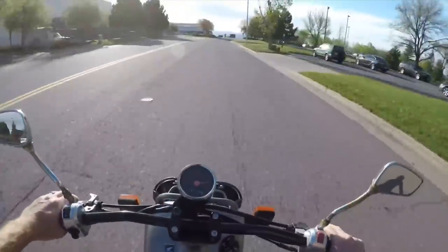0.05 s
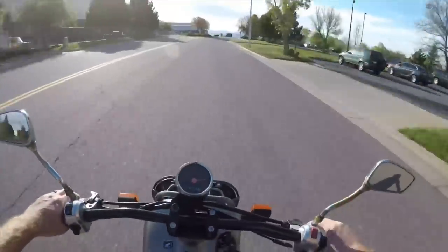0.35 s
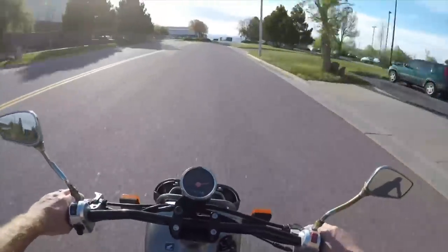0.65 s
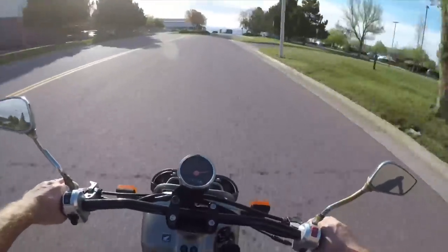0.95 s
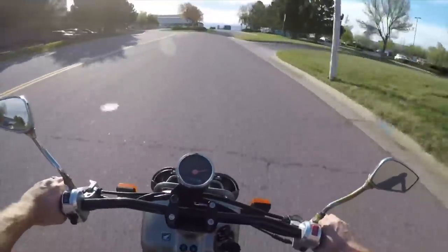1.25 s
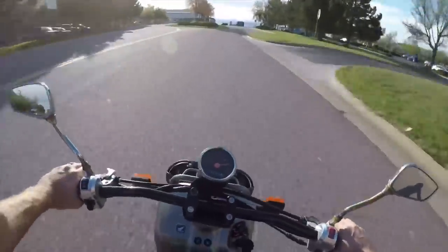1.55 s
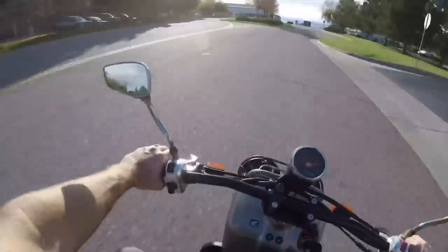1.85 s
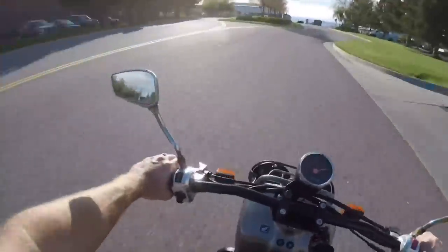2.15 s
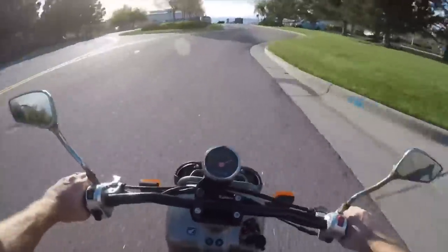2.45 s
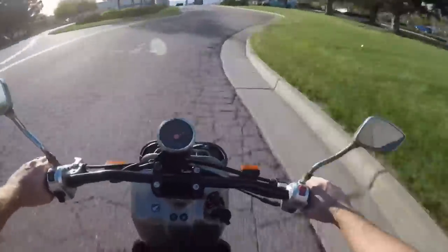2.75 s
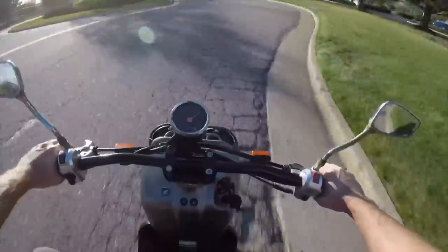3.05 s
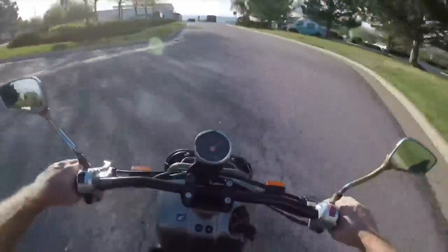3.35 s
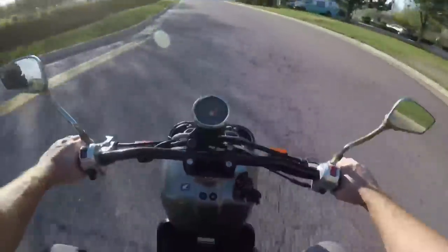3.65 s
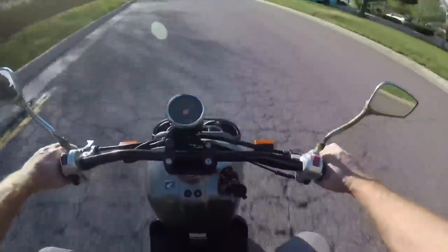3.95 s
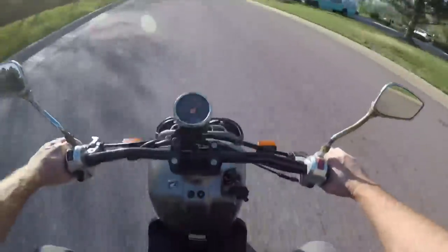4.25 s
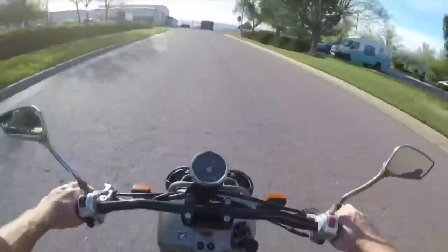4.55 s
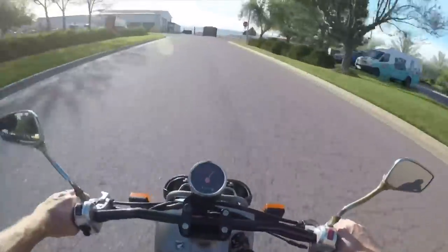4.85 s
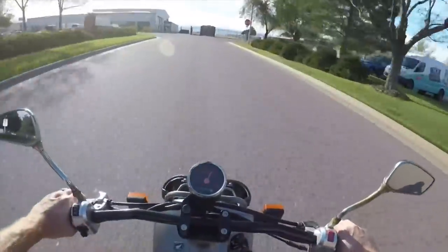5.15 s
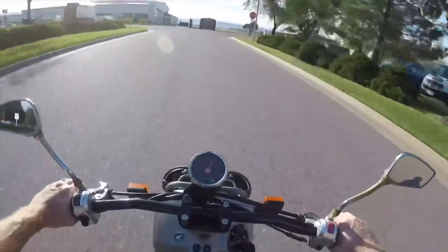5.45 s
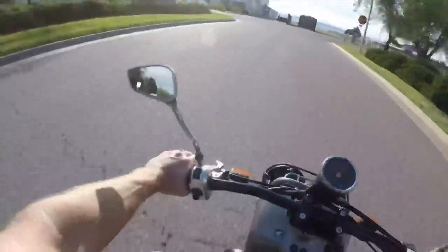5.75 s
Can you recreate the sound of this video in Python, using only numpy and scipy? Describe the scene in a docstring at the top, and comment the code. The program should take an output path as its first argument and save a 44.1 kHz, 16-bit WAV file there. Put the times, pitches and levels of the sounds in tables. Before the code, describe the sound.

A small one-cylinder scooter with an open exhaust is heard close up from the rider's seat, moving along a street. It starts out pulling hard, with a raspy, slightly brassy buzz. At about 0.5 seconds the throttle shuts and the engine coasts, staying loud while its pitch sinks steadily to the end. From around 3.5 seconds some firings go weak, and the exhaust turns into a hollow, uneven burble with small dry pops, most ragged in the last second. Wind rumbles on the microphone throughout, with a gust just before 6 seconds. Underneath are steady tyre hiss, a fine crunch of grit and light valve chatter. Faint, falling gear whines come and go between 1.5 and 5 seconds, and a thin metallic sizzle swells slightly around 5 seconds. Loose parts give two short, bright ticks at about 5.5 seconds.

```python
"""On a street, from the seat of a small one-cylinder scooter with an open exhaust.
Each firing sends a puff of gas down the pipe and makes it ring. The scooter pulls hard, the throttle
shuts after half a second, and the engine runs down, burbling as some firings go weak.
Valves chatter, gears whine, rubbing metal sizzles, and loose parts on the frame tick twice.
Wind buffets the microphone while the tyres hiss and crunch over the asphalt."""
import sys
import numpy as np
from scipy import signal
from scipy.fft import rfft, irfft
from scipy.io import wavfile
from scipy.ndimage import uniform_filter1d, minimum_filter1d

SR = 44100
rng = np.random.default_rng(int(sys.argv[2]) if len(sys.argv) > 2 else 0)


def dump_mix(stems):
    """Bounce the given channels to the path in sys.argv[1] as a 16-bit WAV at rate SR."""
    frames = np.atleast_2d(stems).T  # one column per channel
    limited = np.clip(frames, -1, 1)  # hard clip at full scale
    pcm = np.round(limited * 32767).astype(np.int16)
    wavfile.write(sys.argv[1], SR, pcm)


N = 264159
T = np.arange(N) / SR

# how fast the engine runs: (time [s], speed [firings per s])
ENGINE_SPEED = [(0, 57.8), (.15, 57.8), (.34, 56.1), (.56, 52.961), (.98, 51.019), (1.8, 46.573),
                (2.45, 43.724), (3.77, 38.789), (5.1, 35.711), (6, 34.394)]
# how far the throttle is open: (time [s], opening [0 to 1])
THROTTLE = [(0, 0.98), (.15, 0.9), (.23, 0.58), (.44, 0.85), (.48, 0), (6, 0)]
# how often the slowing engine misses (fires weakly): (time [s], gap between misses [firings])
MISS_EVERY = [(3.55, 6.1), (4.6, 3.7), (5.4, 4.2), (5.6, 2)]
# exhaust volume, highest midway through the run-down: (time [s], gain [dB])
EXHAUST_VOLUME = [(0, -17), (.44, -19.5), (.6, -16.5), (2, -13.5), (3.6, -14.5), (5.75, -14), (6, -17.5)]
# A "tone" table says how strong the low and high parts of a sound are next to each other.
# tone of a puff while pulling: (frequency [Hz], level [dB])
PUFF_PULLING = [(30, -41), (105, 5.5), (225, -6.5), (290, 4.5), (380, -2), (490, 0), (740, -7.5), (830, -1),
                (930, -4.5), (1030, -20), (1350, -39), (1860, -22), (2500, -37), (3500, -51)]
# tone of a puff while coasting fast: (frequency [Hz], level [dB])
PUFF_FAST = [(30, 3.5), (100, -1.5), (190, -2), (260, 3), (400, -10.5), (500, -7.5), (620, -7),
             (770, -24.5), (850, -18.5), (925, -7), (1010, -11), (1090, -7), (1270, -26.5), (1750, -39),
             (3500, -57.5)]
# tone of a puff while coasting slowly: (frequency [Hz], level [dB])
PUFF_SLOW = [(30, -4), (110, 2), (190, -2), (335, 1.5), (430, -12), (570, -3), (790, -23), (880, -9),
             (940, -6), (1015, -13), (1085, -16.5), (1250, -29), (3500, -52)]
# two pipe notes that sink as the gas cools: (time [s], lower note [Hz], upper note [Hz])
PIPE_NOTES = [(.5, 228, 470), (1.5, 201, 455), (2.6, 185, 421), (3.5, 164, 421)]
# tone of gas swirling out of the pipe: (frequency [Hz], level [dB])
GAS_TONE = [(60, -21.5), (190, 7), (290, 1), (450, 0.5), (560, 1), (740, -7), (900, 5), (1000, -11),
            (1090, 1), (1250, -25.5), (1700, -24), (2500, -56), (6000, -37.5)]
# tone of the gurgle of a miss: (frequency [Hz], level [dB])
GURGLE_TONE = [(100, -31), (200, -0.5), (330, -2), (420, -5.5), (570, -4), (720, -17), (1000, -25),
               (1600, -35.5)]
# tone of rasping gas while pulling: (frequency [Hz], level [dB])
RASP_TONE = [(1500, -22), (4200, 0.5), (6500, -3), (9000, 1.5), (11500, 1.5), (13000, -4), (15500, -6)]
# notes of the pipe's metal wall: (pitch [Hz], width [Hz], relative level [dB])
WALL_NOTES = [(1338, 17, 6), (1850, 33, -5.5), (2620, 83, -10), (5630, 200, -15)]
# tone of the dry crack at the front of a pop: (frequency [Hz], level [dB])
CRACK_TONE = [(200, -10), (700, 2), (1200, -6), (2000, -18), (3000, -19), (4500, -42)]
# tone of the chattering valves: (frequency [Hz], level [dB])
VALVE_TONE = [(1200, -8), (1800, 13.5), (2250, -11), (2800, 6.5), (3400, -22), (5000, -12), (8000, -26)]
# tone of wind on the microphone: (frequency [Hz], level [dB])
WIND_TONE = [(8, -3), (20, -0.5), (36, -5), (60, -8), (100, -9.5), (200, -19), (400, -22), (800, -26),
             (2000, -67)]
# gusts and lulls of the wind: (middle [s], half length [s], level change [dB])
GUSTS = [(.65, 0.56, 1.5), (2.2, 0.37, -2), (5.83, 0.099, 4)]
# tone of tyre and engine hiss: (frequency [Hz], level [dB])
ROAD_TONE = [(740, -20.5), (1250, 0), (1390, 0), (2320, -15), (3030, -14.5), (5160, -29), (7580, -27),
             (8710, -25), (9800, -26), (10400, -25), (14700, -42.5), (15500, -36), (16000, -39)]
# tone of grit under the tyres: (frequency [Hz], level [dB])
GRIT_TONE = [(1100, -10), (1700, 12), (2300, 13), (3000, -0.5), (4400, 9), (5600, 0.5), (7500, -8),
             (12000, -24)]
# worn stretches of asphalt: (middle [s], half length [s], level rise [dB])
WORN_ASPHALT = [(1.6, 0.97, 5.8), (3.22, 0.15, 4.2)]
# notes of rubbed thin metal in the drive: (pitch [Hz], width [Hz], relative level [dB])
SIZZLE_NOTES = [(8400, 450, -2.5), (8950, 540, 0), (10550, 990, -1), (11520, 450, -3.5),
                (12700, 1200, -2.5), (14500, 1200, -3.5)]
# moments when the drive rubs harder: (middle [s], half length [s], level rise [dB])
RUBS = [(3.25, .22, 2.9), (4.85, 0.56, 5.8), (5.46, 0.12, 3.8)]
# gear whines: (start [s], end [s], starting pitch [Hz], pitch fall [Hz per s], level [dB])
GEAR_WHINES = [(1.62, 2.1, 3190, 270, -47), (2.1, 2.6, 2995, 130, -53), (2.93, 3.48, 2575, 230, -47.5),
               (2.5, 3.4, 1420, 75, -40), (4.12, 4.9, 605, 36, -30)]
# ticks of loose parts: (time [s], pitch [Hz], width [Hz], starting level [dB], fade time [s])
TICKS = [(5.453, 13080, 5000, -15, 0.0011), (5.604, 8000, 1400, -27, 0.0014),
         (5.604, 2800, 2600, -22.5, 0.0025)]


def firings(spread_db, jitter_s, carry):
    """One kick per engine cycle. A miss burns only partly, and its unburnt fuel boosts the next kick."""
    miss_share, miss_spread = 0.45, 0.041  # a miss keeps this share of a full kick, give or take
    cycles = np.cumsum(curve(ENGINE_SPEED)) / SR + .274
    times = np.interp(np.arange(1, int(cycles[-1]) + 1), cycles, T)
    size, slip, burn = rng.standard_normal((len(times), 3)).T
    when, every = np.transpose(MISS_EVERY)
    misses_per_firing = (times > when[0]) / np.interp(times, when, every)
    is_miss = np.diff(np.floor(np.cumsum(misses_per_firing) + .9), prepend=0)
    unburnt = is_miss * (1 - np.clip(miss_share + miss_spread * burn, .01, 1))
    strength = (1 - unburnt) * (1 + carry * np.roll(unburnt, 1))
    at = np.clip(np.round((times + jitter_s * slip) * SR).astype(int), 0, N - 1)
    kicks, misses = np.zeros((2, N))
    kicks[at] = strength * gain_of(spread_db * size)
    misses[at] = unburnt
    return kicks, misses


def exhaust(kicks, misses, throttle):
    """Puffs of gas, brighter while pulling and deeper as the engine slows, with their rush and gurgle."""
    pulling = pipe(kicks, PUFF_PULLING, slosh=-0.85, round_trip_s=0.00458, echo=0.45)
    fast = pipe(kicks, PUFF_FAST, slosh=0.56, round_trip_s=0.003587, echo=0.94)
    low_note = 0.77 * resonate(fast, curve(PIPE_NOTES, column=1), width_hz=33)
    high_note = 1.9 * resonate(fast, curve(PIPE_NOTES, column=2), width_hz=51)
    popping = gain_of(0.5) * pipe(kicks, PUFF_SLOW, slosh=0.49, round_trip_s=0.003497, echo=1.0)
    hollow = .7 * resonate(popping, hz=935, width_hz=110)
    slow = slower_than(rate=39.2, blend=2.4)
    coasting = (1 - slow) * evened(fast + low_note + high_note) + slow * (popping + hollow)
    puffs = np.sqrt(throttle) * pulling + np.sqrt(1 - throttle) * coasting
    return gain_of(curve(EXHAUST_VOLUME)) * (puffs + gas_rush(kicks, throttle) + gurgle(misses))


def pipe(kicks, puff_tone, slosh, round_trip_s, echo):
    """Gas sloshes at the start of the pipe, then the open end sends back a duller, upside-down puff."""
    taps = np.zeros(45)
    taps[[0, -1]] = 1, slosh
    wave = signal.lfilter(taps[::-1], taps, colour(kicks, puff_tone))  # longer puff, same tone
    dulled = uniform_filter1d(wave, size=44)
    return evened(wave - echo * delayed(dulled, round_trip_s))


def gas_rush(kicks, throttle):
    """Swirling gas leaves the pipe, surging after each puff."""
    flow = .5 + bursts(np.sqrt(kicks), decay_s=.006)
    return gain_of(-9.5 - 5 * throttle) * shaped_noise(flow, GAS_TONE)


def gurgle(misses):
    """With no pressure behind a miss, gas is sucked back just before the puff is due."""
    backflow = delayed(bursts(misses, decay_s=0.0068), seconds=-0.0065)
    return gain_of(-17.5) * shaped_noise(backflow, GURGLE_TONE)


def rasp(kicks):
    """A sharp hiss of gas follows each firing during the first hard pull, then dies away."""
    hold_s, fall_db_per_s = 0.22, 80
    spurts = uniform_filter1d(delayed(bursts(kicks, decay_s=0.0031), seconds=0.0036), size=130)
    level_db = -42 - fall_db_per_s * np.maximum(T - hold_s, 0)
    return gain_of(level_db) * shaped_noise(spurts, RASP_TONE)


def pipe_wall(kicks, throttle):
    """Hard firings make the thin metal of the pipe ring with a brassy edge."""
    ring = sum(gain_of(db) * evened(resonate(kicks, hz, width)) for hz, width, db in WALL_NOTES)
    return gain_of(-35) * throttle * evened(ring)


def half_open_ring(kicks, throttle):
    """A nasal note of the pipe, loudest at half throttle and silent once it shuts."""
    hz, width_hz = 1103, 120
    ring = resonate(resonate(kicks, hz, width_hz), hz, width_hz)
    return gain_of(-27) * np.sin(np.pi * throttle) ** 2 * evened(ring)


def crack(kicks):
    """Once the engine has slowed, full firings burst out with a dry crack, some louder than others."""
    scatter_db = 5 * np.clip(rng.standard_normal(N), -2, 2)
    edges = delayed(kicks ** 2 * gain_of(scatter_db), seconds=0.001214)
    return gain_of(-39) * slower_than(rate=42, blend=6.3) * evened(colour(edges, CRACK_TONE))


def valves(kicks, throttle):
    """Metal valves tap once a cycle, loudest while pulling and when the engine runs slowly."""
    taps = delayed(bursts(np.sign(kicks), decay_s=0.0051), seconds=0.0015)
    steady_hiss = 1 - throttle
    level_db = -48 + 9 * throttle + 4.5 * slower_than(rate=38, blend=0.58)
    return gain_of(level_db) * shaped_noise(taps + steady_hiss, VALVE_TONE)


def wind():
    """Swirling air rumbles on the microphone, rising in gusts and sinking in lulls."""
    lumps = gain_of(0.49 * drift(21))
    return gain_of(-16.5 + swells(GUSTS)) * shaped_noise(lumps, WIND_TONE)


def road_hiss(kicks):
    """Tyre noise and engine hiss, pulsing a little with each firing."""
    flutter = (1 + 0.048 * bursts(kicks, decay_s=0.03)) * gain_of(drift(120))
    return gain_of(-34.5) * shaped_noise(flutter, ROAD_TONE)


def grit():
    """Fine grit crunches under the tyres, louder on worn asphalt."""
    crunch = gain_of(2.5 * drift(200))
    return gain_of(-51.5 + swells(WORN_ASPHALT)) * shaped_noise(crunch, GRIT_TONE)


def drive_sizzle(throttle):
    """Light rubbing makes thin metal in the drive ring as the scooter coasts."""
    ring = np.zeros(N)
    for hz, width, db in SIZZLE_NOTES:
        loudness = gain_of(db + 0.93 * drift(5))
        ring += loudness * band_noise(hz * (1 + .008 * drift(2.6)), width)
    level_db = -47.5 + swells(RUBS) + 0.99 * drift(70)
    return gain_of(level_db) * (1 - throttle) * evened(ring)


def gear_whine():
    """The gears sing in thin notes that come and go, sinking as the scooter slows."""
    sound = np.zeros(N)
    for start, end, hz, fall, db in GEAR_WHINES:
        fade = uniform_filter1d(1. * ((T > start) & (T < end)), size=6000)
        pitch = (hz - fall * (T - start)) * (1 + 0.0091 * drift(58.6))
        note = evened(np.sin(2 * np.pi * np.cumsum(pitch) / SR))
        sound += fade * gain_of(db + 1.2 * drift(62)) * note
    return sound


def ticks():
    """Loose parts on the frame give short, bright clicks."""
    return sum(gain_of(db) * (T >= start) * np.exp(-abs(T - start) / decay) * band_noise(hz, width)
               for start, hz, width, db, decay in TICKS)


def gain_of(db):
    """Turns decibels into a number to multiply a sound by."""
    return 10 ** (np.asarray(db) / 20)


def evened(x):
    """Scales a signal to an average strength (rms) of one."""
    return x / np.sqrt(np.mean(x ** 2) + 1e-20)


def curve(rows, column=1):
    """Joins the points of a time table with straight lines, giving a value for every sample."""
    rows = np.asarray(rows, float)
    return np.interp(T, rows[:, 0], rows[:, column])


def slower_than(rate, blend):
    """Goes from 0 to 1 as the engine falls through the given firings per second."""
    return (1 + np.tanh((rate - curve(ENGINE_SPEED)) / blend)) / 2


def swells(rows):
    """Smooth rises or dips in dB, one for each row."""
    return sum(db * np.exp(-((T - middle) / half) ** 2) for middle, half, db in rows)


def drift(rate_hz):
    """A random wobble of strength one, up to about the given rate."""
    f = np.fft.rfftfreq(N, 1 / SR)
    return evened(irfft(rfft(rng.standard_normal(N)) / (1 + (f / rate_hz) ** 4), N))


def delayed(x, seconds):
    """The same signal, later (or earlier, for a negative time)."""
    return np.interp(T - seconds, T, x, left=0)


def bursts(kicks, decay_s):
    """A loudness curve that jumps at every kick and dies away."""
    return evened(signal.lfilter([1], [1, -np.exp(-1 / (decay_s * SR))], kicks))


def colour(x, tone, size=8192):
    """Filters a sound so that its lows and highs follow a tone table."""
    hz, db = np.transpose(tone)
    f = np.fft.rfftfreq(size, 1 / SR)
    shape_db = np.interp(np.log(f + 1), np.log(hz + 1), db)
    shape_db -= 24 * np.log2(np.maximum(f / hz[-1], 1))  # fade out above the last row
    # folding the cepstrum makes the filter ring after each kick, never before it
    cepstrum = irfft(np.log(gain_of(np.maximum(shape_db, -100))))
    cepstrum[1:size // 2] *= 2
    cepstrum[size // 2 + 1:] = 0
    return signal.oaconvolve(x, irfft(np.exp(rfft(cepstrum))))[:N]


def shaped_noise(loudness, tone):
    """Noise of strength one that follows a loudness curve and a tone table."""
    return evened(colour(loudness * rng.standard_normal(N), tone))


def resonate(x, hz, width_hz):
    """Lets a sound ring at one steady or moving pitch; a smaller width rings longer."""
    turn = np.exp(2j * np.pi * np.cumsum(hz * np.ones(N)) / SR)
    keep = np.exp(-np.pi * width_hz / SR)
    return 2 * (turn * signal.lfilter([1 - keep], [1, -keep], x / turn)).real


def band_noise(hz, width_hz):
    """Noise gathered around one steady or moving pitch."""
    keep = np.exp(-np.pi * width_hz / SR)
    noise = rng.standard_normal(N) + 1j * rng.standard_normal(N)
    smoothed = signal.lfilter([1], [1, -2 * keep, keep * keep], noise)
    turn = np.exp(2j * np.pi * np.cumsum(hz * np.ones(N)) / SR)
    return evened((smoothed * turn).real)


def scene():
    """Engine, wind, road and drive, added up in one channel at the rider's chest."""
    throttle = curve(THROTTLE)
    kicks, misses = firings(spread_db=0.95, jitter_s=.00005, carry=0.029)
    engine = exhaust(kicks, misses, throttle) + rasp(kicks)
    engine += pipe_wall(kicks, throttle) + half_open_ring(kicks, throttle)
    engine += crack(kicks) + valves(kicks, throttle)
    street = wind() + road_hiss(kicks) + grit()
    return (engine + street + drive_sizzle(throttle) + gear_whine() + ticks())[None]


def record(dry):
    """The microphone drops the deepest rumble, a limiter turns down peaks, and the top treble is cut."""
    rumble_hz, ceiling, treble_hz = 12, .93, 15600
    heard = signal.sosfilt(signal.butter(2, rumble_hz, "high", fs=SR, output="sos"), dry)
    safe_gain = np.minimum(1, ceiling / (abs(heard[0]) + 1e-9))
    limited = heard * uniform_filter1d(minimum_filter1d(safe_gain, size=101), size=101)
    treble_cut = signal.firwin(511, treble_hz, window=("kaiser", 9), fs=SR)
    return signal.oaconvolve(limited, treble_cut[None], "same")


dry = scene()
out = record(dry)
dump_mix(out)
```